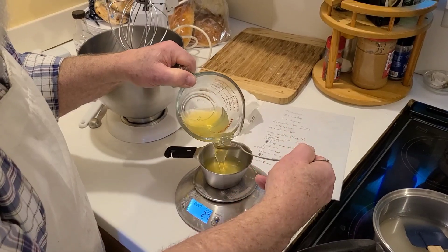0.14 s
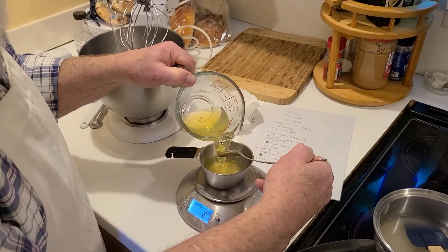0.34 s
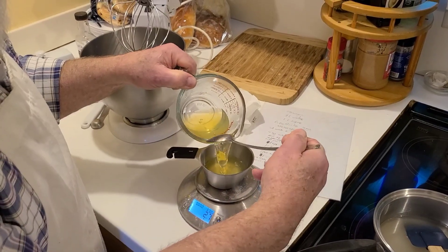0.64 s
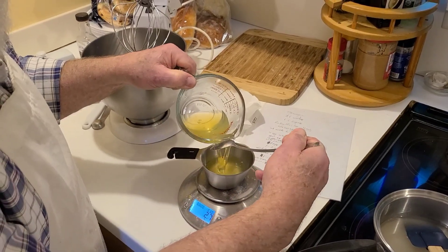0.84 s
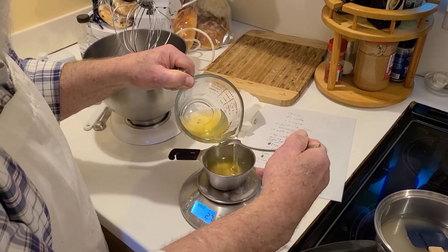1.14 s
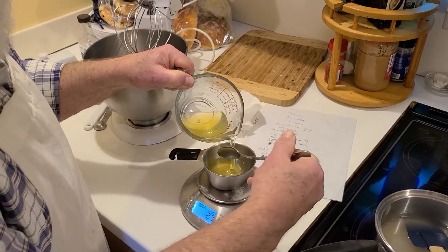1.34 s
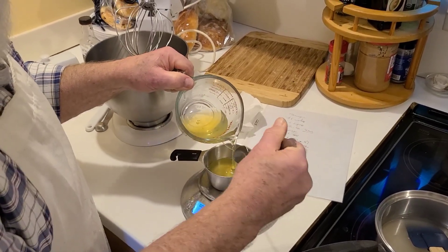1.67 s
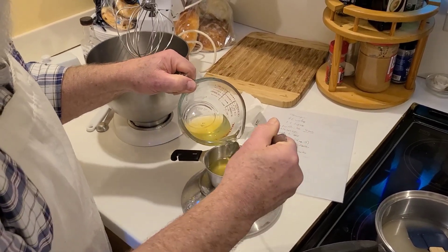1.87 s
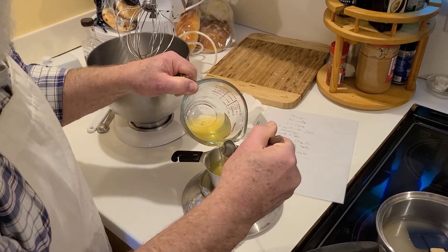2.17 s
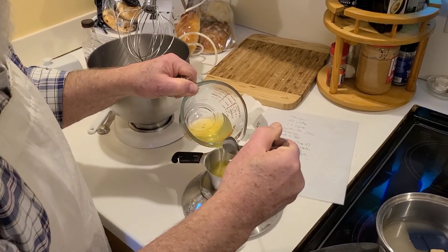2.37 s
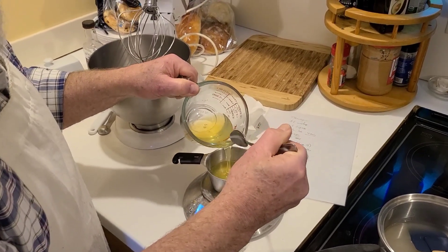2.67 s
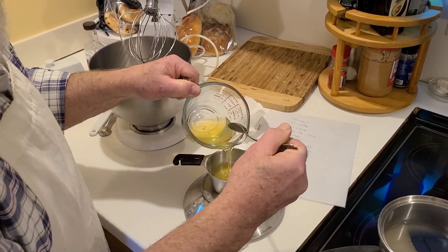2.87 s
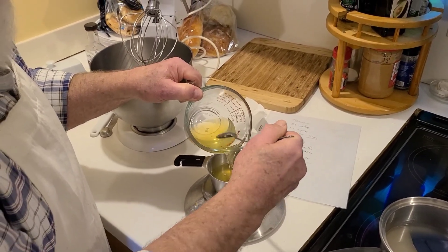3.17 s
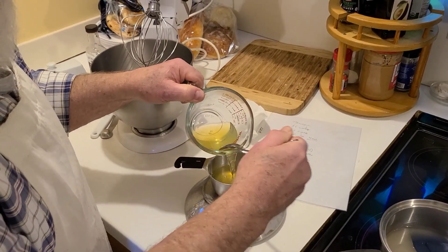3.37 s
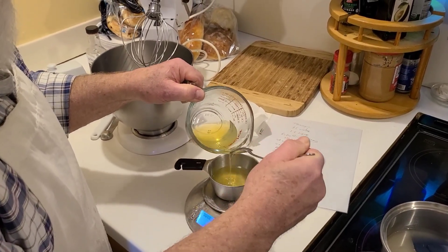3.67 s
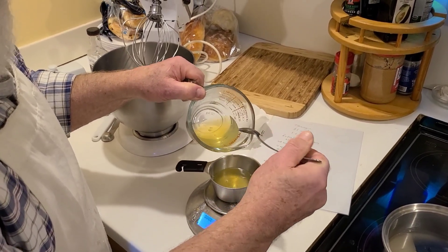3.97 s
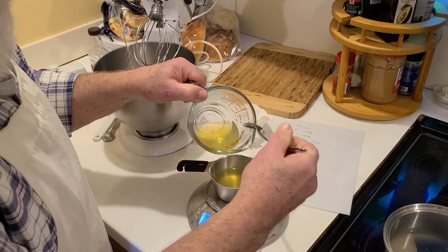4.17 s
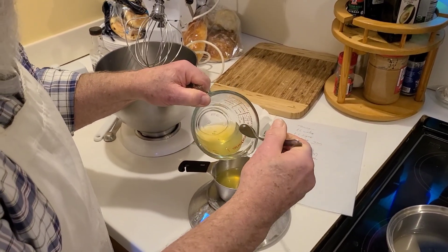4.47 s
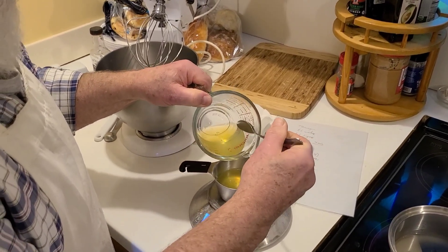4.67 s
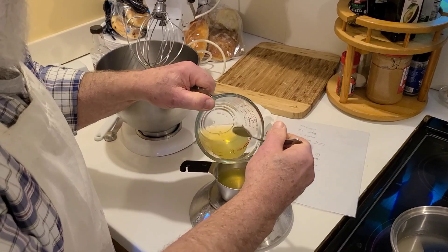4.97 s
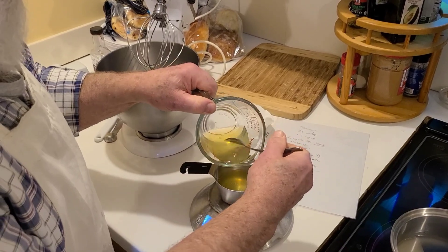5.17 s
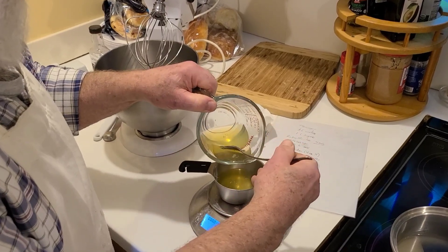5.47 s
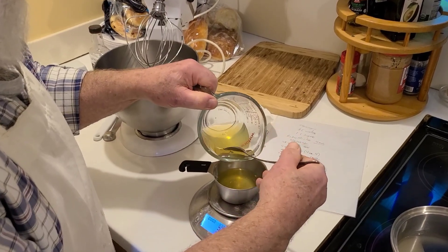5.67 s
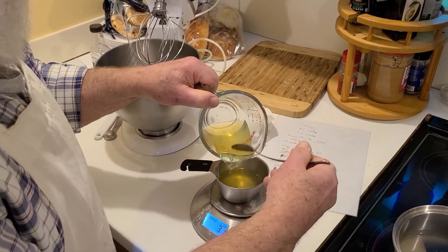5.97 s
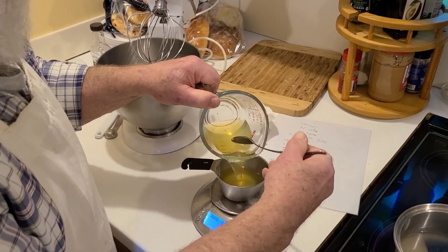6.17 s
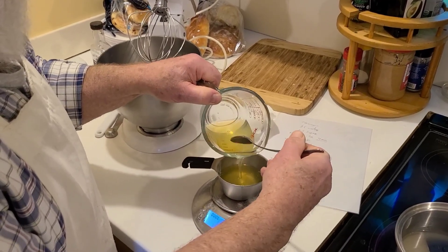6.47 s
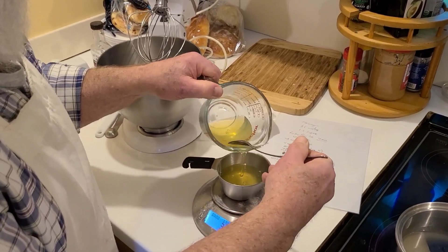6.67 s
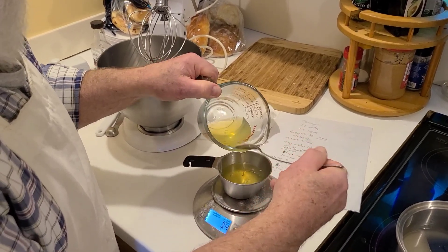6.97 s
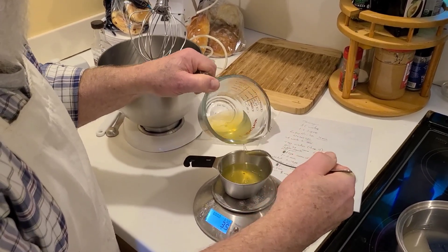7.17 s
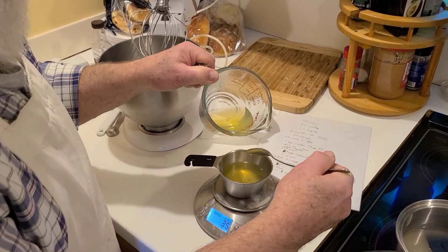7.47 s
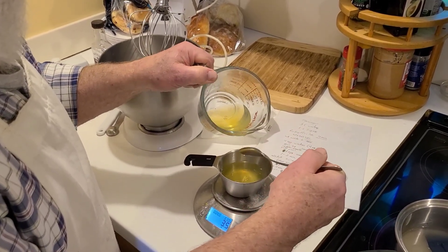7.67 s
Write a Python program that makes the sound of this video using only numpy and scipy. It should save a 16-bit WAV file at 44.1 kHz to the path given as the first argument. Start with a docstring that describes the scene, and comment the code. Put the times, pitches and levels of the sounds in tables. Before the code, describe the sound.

A faint appliance hum and thin hiss run throughout in a small kitchen with a short echo. Soft bumps and a light scrape open the scene, then a steel spoon clinks close by at 0.8 seconds. At about 2 seconds comes the loudest clink, ringing briefly on a glass jug and a steel cup, followed by a short squeak and small scrapes. Two soft scuffs pass around 2.5 to 2.7 seconds. From 3.4 to 3.8 seconds the spoon taps and scrapes the glass with a thin squeak, and it clinks clearly again at 4.3. Between 4.4 and 6 seconds things are moved with dull bumps, with wooden knocks at 4.7 and 5.5 and another clink at 5.2. From 6.7 to 7.1 seconds several light clinks mix with a scrape along the steel rim. Faint bumps follow near 7.5 seconds.

```python
"""On a kitchen counter, a steel spoon guides liquid from a glass measuring jug into a small steel cup.
What is heard is the spoon on both rims: impacts ring the modes of glass and steel, and stick-slip
friction makes scrapes and squeaks. Counter and walls answer closely. Scuffs, dull bumps and knocks
on wood come from elsewhere in the kitchen, over the hum of an appliance."""
import sys
import numpy as np
from scipy import signal
from scipy.fft import rfft, irfft, next_fast_len
from scipy.io import wavfile
from scipy.ndimage import map_coordinates

SR = 44100
rng = np.random.default_rng(int(sys.argv[2]) if len(sys.argv) > 2 else 0)


def wrap_up_sound(samples):
    """Save the sound to the file named by the first command line argument, as 16-bit audio."""
    columns = np.atleast_2d(samples).T
    # keep every value between -1 and 1, then stretch to whole-number steps
    tamed = np.clip(columns, -1, 1)
    steps = np.round(tamed * 32767).astype(np.int16)
    wavfile.write(sys.argv[1], SR, steps)


N = 345302
T = np.arange(N) / SR
LIFE = T[:SR // 2]  # time axis of one short event
TOP_HZ = 15600  # band limit

# normal modes of the glass jug, the steel cup and the spoon: (f/Hz, relative level/dB, t60/s)
JUG = [(1400, 2, .17), (1755, -6, .08), (1820, -7, .08), (2250, -11, .07), (3440, 1, .18), (3830, -4, .17),
       (4365, 3, .18), (5440, -9, .13), (6700, -9, .1), (7090, -8, .16), (8380, -5, .14), (9500, -7, .14),
       (10580, -11, .12), (12240, -15, .1)]
CUP = [(1330, -6, .08), (1420, -1, .1), (1490, -3, .13), (1790, -2, .07), (3440, 1, .13), (3712, 4, .12),
       (3820, -2, .14), (4490, -11, .12), (4680, -13, .1), (6630, -6, .11), (6765, -1, .11), (7208, 0, .13),
       (7685, -12, .13), (9330, -13, .1), (10490, -4, .12)]
SPOON = [(1710, -15, .08), (3190, 3, .07), (3275, 3, .1), (3820, -2, .13), (8310, -5, .09), (8830, -8, .08),
         (8960, -10, .12), (11720, -6, .14), (12130, -5, .15)]
# crossovers between the knock and the low, mid and top ring: (f/Hz)
RING_EDGES = [1100, 2500, 6000]


def clinks(cushion_s=.0008, choke_s=.006, rattle_t60=.09):
    """Impact excitation: each contact cracks, rattles and leaves jug, cup and spoon in free vibration."""
    # (t/s, knock, low, mid and top ring level/dB, jug, cup and spoon share/dB, choke/dB)
    contacts = [(0.187, -68, -46.5, -48, -62.5, 4, 2, -16, 11),
                (0.8151, -43, -36.5, -33.5, -34, -12, -6.5, 4, 4.5),
                (0.939, -68, -56, -62, -65.5, -12, -10, 2, -4),
                (1.581, -85, -65, -62, -85, -23, -29, 3, 20),
                (1.9597, -50, -27.5, -31.5, -34, 3.5, 7.5, -5, 2),
                (2.015, -75, -34.5, -37.5, -81, -14, 5, -25, 9),
                (3.3967, -65, -39, -37.5, -43.5, -16, -19, 10, 9),
                (3.5427, -72, -61, -59, -54.5, 0, -25, -12, 8), (3.6123, -73, -57, -54, -59, 8, -11, -8, 4),
                (3.7122, -59, -40, -42.5, -48.5, 2, -28, 2.5, 3),
                (4.3305, -45.5, -31.5, -33.5, -37.5, -1.5, -19, -25, 2),
                (4.568, -50, -41.5, -51, -55.5, 12, -33, -31, 13.5),
                (5.2318, -77, -38, -45.5, -50.5, 0.5, -9, -4, 0.5),
                (6.734, -87, -45.5, -37.5, -43, -6.5, -6, -3, 4),
                (6.866, -81, -49.5, -43.5, -57, 3.5, 0, 5, 11),
                (7.072, -63.5, -62, -48.5, -64, -8, -16, -10.5, 4),
                (7.1131, -76.5, -46.5, -44.5, -43.5, -9, 0.5, 6, -8)]
    # spectrum of the crack: (f/Hz, relative level/dB)
    crack_colour = [(250, -34.5), (750, -6.5), (1500, 3), (1900, 1.5), (2500, -12), (3700, 14.5),
                    (5400, -0.5), (6100, -14.5), (6800, -28.5), (9000, -10), (12200, -10.5), (13500, -7),
                    (15000, -15)]
    out = np.zeros((2, N))
    for start, *register_db, jug_db, cup_db, spoon_db, choke_db in contacts:
        crack = filtered(rng.standard_normal(len(LIFE)), lambda hz: amp(along(crack_colour, hz)))
        blow = crack * (amp(19 - 60 * LIFE / .014) + amp(5 - 60 * LIFE / rattle_t60))
        for db, modes in ((jug_db, JUG), (cup_db, CUP), (spoon_db, SPOON)):
            blow += amp(db) * ring(modes, scatter_db=.5, damping_db_per_s=333)  # grip and liquid damp it
        blow += amp(-14) * shimmer(t60=.11)
        blow *= 1 - np.exp(-LIFE / cushion_s)  # the wet rim softens the blow
        blow *= amp(choke_db * np.exp(-LIFE / choke_s))  # a spoon that stays in contact chokes the ring
        registers = split(kitchen(blow, near_t60=.035), RING_EDGES)
        onset = int(.016 * SR)  # the first moment sets each register's level
        clink = sum(amp(db) * part / rms(part[:, :onset]) for part, db in zip(registers, register_db))
        add(out, start, panned(clink, pan_db=3))
    return out


def shimmer(t60, count=50):
    """High modal density: a crowd of upper modes that changes with the spot struck."""
    frequencies = np.geomspace(2800, 13500, count) * np.exp(.02 * rng.standard_normal(count))
    return ring([(hz, 0, t60) for hz in frequencies], scatter_db=4)


def scrapes(touch_t60=.06, grit_t60=.0087):
    """Frictional excitation: tiny uneven slips drive the modes while the sliding spoon damps them."""
    # (t/s, rim, attack/s, hold/s, low, mid and top ring level/dB)
    drags = [(0.162, "jug", .022, 0.0023, -50, -47, -66), (2.019, "cup", .005, 0.025, -56.5, -43.5, -68),
             (2.296, "cup", 0.007, 0.071, -58.5, -66, -66), (2.366, "cup", 0.021, 0.02, -65, -55.5, -62.5),
             (3.547, "jug", 0.0089, 0.045, -64.5, -65.5, -65.5),
             (3.611, "jug", 0.0035, 0.094, -60, -50, -60), (3.696, "jug", 0.013, 0.075, -47.5, -52.5, -88),
             (4.488, "jug", 0.028, 0.032, -83, -72, -68), (4.698, "jug", 0.013, 0.045, -58, -58, -64),
             (5.103, "jug", .015, 0.042, -58, -52.5, -73), (6.196, "jug", 0.0074, 0.044, -74, -81, -76),
             (6.88, "cup", 0.022, 0.2, -59, -60, -68), (7.043, "cup", 0.059, 0.013, -53, -37.5, -49),
             (7.356, "cup", 0.021, 0.018, -62, -68, -96)]
    # response of each rim: (modes, left-right difference/dB, slip rate/Hz, grit/dB)
    rims = {"jug": (JUG[:3] + SPOON, 2.6, 1200, 23), "cup": (CUP, 2.5, 1700, 18)}
    # spectral weighting of the rubbing: (f/Hz, gain/dB)
    rub_colour = [(300, -11.5), (1100, -3.5), (1400, -10), (1850, -1.5), (2450, -12), (3600, 2), (4700, -4),
                  (6200, -23), (8500, -8.5), (10500, -10), (12500, -12.5), (15000, -14)]
    out = np.zeros((2, N))
    for start, rim, attack, hold, *register_db in drags:
        modes, pan_db, slips_per_s, grit_db = rims[rim]
        slips = (rng.random(len(LIFE)) < slips_per_s / SR) * rng.standard_normal(len(LIFE))
        body = ring(modes) * amp(-60 * LIFE / touch_t60)
        grit = amp(grit_db - 60 * LIFE / grit_t60) * rng.standard_normal(len(LIFE))
        rub = kitchen(signal.fftconvolve(slips, body + grit))[:, SR // 10:SR // 2]  # steady state
        rub = filtered(rub, lambda hz: amp(along(rub_colour, hz)))
        rub = weighted(rub, RING_EDGES[1:], register_db, attack + hold)
        pressure = stroke(T[:rub.shape[1]], attack, hold, fall_db_per_s=414)
        add(out, start, panned(pressure * rub, pan_db))
    return out


def squeaks(sharp=.219, settle_s=.00544, jitter=.013, overtone_fade_db_per_s=146):
    """Stick-slip oscillation: wet steel slips almost periodically, each slip with a puff of rasp."""
    # (t/s, hold/s, f/Hz, glide/(Hz/s), level/dB, relative overtone level/dB)
    slides = [(2.038, .008, 2036, 0, -41.5, -25), (2.148, 0.07, 2058, -620, -32, -1.5),
              (3.637, 0.0044, 1761, 0, -45.5, -32), (3.715, 0.099, 3220, 498, -50, -40),
              (4.662, 0.0088, 3324, -400, -59, -49), (4.741, 0.035, 3295, -200, -55.5, -40),
              (6.925, 0.088, 4460, 2500, -66, -19)]
    # spectrum of the rasp: (f/Hz, relative level/dB)
    rasp_colour = [(2800, -26), (3900, 3.5), (4500, -6), (5300, -18), (6600, -31), (8000, -12), (9500, -19),
                   (12000, -14), (15000, -27)]
    out = np.zeros((2, N))
    for start, hold, pitch_hz, glide, db, overtone_db in slides:
        hz = pitch_hz * (1 + sharp * np.exp(-LIFE / settle_s)) + glide * LIFE
        waver = np.interp(LIFE, LIFE[::32], rng.standard_normal(len(LIFE[::32])))
        phase = 2 * np.pi * np.cumsum(hz * (1 + jitter * waver)) / SR
        rasp = noise(rasp_colour, len(LIFE))[0] * (1 + .5 * np.cos(phase))
        upper = amp(overtone_db - overtone_fade_db_per_s * LIFE) * (np.sin(2 * phase) + amp(-9) * rasp)
        pressure = stroke(LIFE, attack=.014, hold=hold, fall_db_per_s=450)
        tone = amp(db) * np.sqrt(2) * pressure * (np.sin(phase) + upper)
        heard = kitchen(tone, near_db=7, near_t60=.04, tail_db=-2)
        heard *= np.sqrt(2) * np.linalg.norm(tone) / np.linalg.norm(heard)  # keep the tone's energy
        add(out, start, panned(heard, pan_db=1))
    return out


def scuffs(hollow_hz=1255, sink_octaves_per_s=4.4):
    """Sliding friction: broadband noise with a hollow resonance that sinks in pitch."""
    # a long scuff and a short slap: (t/s, attack/s, hold/s, scuff/dB, hiss/dB, relative resonance/dB)
    slides = [(2.497, 0.046, 0.042, -52, -58.5, -3.5), (2.704, 0.028, 0.0068, -43.5, -68, -14.5)]
    # spectrum of the friction: (f/Hz, relative level/dB)
    colour = [(60, -23), (130, -16), (260, -6.5), (400, -14.5), (600, -9), (1100, -10), (1500, -9.5),
              (1850, -11.5), (2400, -18), (3400, -9), (4900, -10), (6500, -46), (8000, -31), (14000, -64)]
    # crossover between scuff and hiss: (f/Hz)
    edges = [2200]
    out, t = np.zeros((2, N)), T[:SR]
    for start, attack, hold, *register_db, hollow_db in slides:
        hollow = narrowband(hollow_hz * 2 ** (-sink_octaves_per_s * t), half_width_hz=110)
        scuff = weighted(noise(colour, SR) + amp(hollow_db) * hollow, edges, register_db, attack + hold)
        add(out, start, stroke(t, attack, hold, fall_db_per_s=197) * scuff)
    return out


def bumps():
    """Forced vibration: things being moved rumble and rattle, each stirring one low resonance."""
    # (t/s, hold/s, boom, body and clatter level/dB, resonance f/Hz, relative resonance level/dB)
    moves = [(0.0, 0.068, -52, -47, -53.5, 264, 0), (0.218, 0.024, -62, -50, -74, 254.6, -7.5),
             (4.411, 0.18, -75, -58.5, -62.5, 259.6, -9), (4.547, 0.15, -67, -51.5, -62, 264, -1.5),
             (4.703, .04, -46, -40.5, -45.5, 266, -14), (4.822, 0.13, -53, -46, -54, 261.4, -10),
             (4.98, 0.19, -67, -52, -57, 176.3, -9), (5.101, 0.02, -43, -37.5, -47, 128.3, -17),
             (5.541, 0.059, -57, -50.5, -60, 232, -20), (5.737, 0.057, -43.5, -51.5, -55.5, 58, 8),
             (5.911, .02, -69, -73, -64, 298, -18), (7.463, 0.089, -87, -59.5, -60, 179, 1.5),
             (7.661, 0.072, -78, -62, -100, 181, 9)]
    # spectrum of the rumble: (f/Hz, relative level/dB)
    colour = [(25, -58), (42, -13), (60, 3.5), (82, -7), (128, 3), (210, -1.5), (262, 2), (400, -5.5),
              (520, -15), (700, -11.5), (900, -17.5), (1600, -18.5), (2300, -27), (3500, -27.5),
              (5000, -39), (6500, -65.5), (15000, -53)]
    # crossovers between boom, body and clatter: (f/Hz)
    edges = [110, 450]
    out, t = np.zeros((2, N)), T[:SR]
    for start, hold, *register_db, hz, resonance_db in moves:
        rattle_db = np.interp(t, np.linspace(0, 1, 90), rng.standard_normal(90))
        rumble = noise(colour, SR) + amp(resonance_db) * sine(hz, t)
        push = stroke(t, attack=.013, hold=hold, fall_db_per_s=157)
        add(out, start, push * weighted(rumble * amp(rattle_db), edges, register_db, hold))
    return out


def wood_knocks(thud_t60=.13, cushion_s=.0015):
    """Heavily damped vibration: a soft blow on wood gives a few short modes and a thud."""
    # (t/s, level/dB)
    blows = [(4.728, -40), (5.462, -46.5)]
    # modes of the wood: (f/Hz, relative level/dB, t60/s)
    modes = [(600, -3, .06), (690, -2, .07), (780, -1, .08), (1250, -11, .06), (1480, -8, .06)]
    # spectrum of the thud: (f/Hz, relative level/dB)
    thud_colour = [(100, 5.5), (450, -4.5), (700, 13), (1000, -13), (1500, -8), (2000, -21), (4000, -23),
                   (7000, -45)]
    out = np.zeros((2, N))
    for start, db in blows:
        thud = amp(5 - 60 * LIFE / thud_t60) * noise(thud_colour, len(LIFE))
        blow = (ring(modes) + thud) * (1 - np.exp(-LIFE / cushion_s))
        knock = kitchen(blow, near_db=2, near_t60=.027, tail_db=0)
        add(out, start, amp(db) * knock / rms(knock[:, :SR // 20]))
    return out


def room_tone(air_db=-63.5, hiss_db=-74, hum_gain_db=-1):
    """Line and continuous spectra: an appliance hums over soft air noise and a thin, steady hiss."""
    # lines of the hum, spectra of air and hiss: (f/Hz, relative level/dB)
    hum_lines = [(59.2, -70.5), (118.4, -78.5), (296.1, -74), (371.4, -77.5), (532.9, -84)]
    air_colour = [(12, -38), (20, -8.5), (63, -1.5), (87, -15.5), (109, -11), (173, -5.5), (197, -13),
                  (293, -8.5), (325, -12), (369, -13), (768, -20.5), (1030, -20.5), (3000, -28),
                  (3900, -69), (6600, -120)]
    hiss_colour = [(2300, -24), (3200, 3), (3700, 6), (4250, 4.5), (4900, -2.5), (5800, -19), (7800, -24.5),
                   (9000, -9), (10400, -8), (11500, -9.5), (15000, -14)]
    hum = sum(amp(db + hum_gain_db) * sine(hz, T) for hz, db in hum_lines)
    return hum + amp(air_db) * noise(air_colour, N) + amp(hiss_db) * noise(hiss_colour, N)


def kitchen(x, near_db=0, near_t60=.058, tail_db=-5):
    """Reverberation: direct sound, early reflections off counter and bowls, and a diffuse tail."""
    # reverberation time of the room: (f/Hz, t60/s)
    decay_times = [(300, 0.065), (1500, 0.34), (4000, 0.29), (8000, 0.25), (14000, 0.073)]
    hz, t, spectrum = signal.stft(rng.standard_normal((2, len(LIFE))), SR, nperseg=256)
    spectrum *= amp(-60 * t / along(decay_times, hz)[:, None])
    tail = signal.istft(spectrum, SR, nperseg=256)[1][:, :len(LIFE)]
    near = rng.standard_normal(tail.shape) * amp(-60 * LIFE / near_t60)
    echo = amp(tail_db) * tail / np.linalg.norm(tail[0]) + amp(near_db) * near / np.linalg.norm(near[0])
    echo[:, 0] += 1  # direct path
    return signal.fftconvolve(np.atleast_2d(x), echo, axes=1)


def panned(x, pan_db):
    """Level difference: a source left of centre, each register reflected to its own side by the bowls."""
    # (f/Hz, left-right difference/dB)
    lean = [(700, 1), (1250, -6.5), (2100, -1.5), (3600, 5), (5000, 1), (6600, 12.5), (8800, -5),
            (12500, 9)]

    def balance(hz):
        sides = amp((pan_db + along(lean, hz)) * np.array([[.5], [-.5]]))
        return sides / np.sqrt(np.mean(sides ** 2, axis=0))
    return filtered(x, balance)


def ring(modes, scatter_db=7, damping_db_per_s=0):
    """Modal superposition at random strengths; the added damping, given at TOP_HZ, scales with pitch."""
    out = np.zeros(len(LIFE))
    for hz, db, t60 in modes:
        fall_db_per_s = 60 / t60 + damping_db_per_s * hz / TOP_HZ
        envelope = amp(db - scatter_db * rng.normal() - fall_db_per_s * LIFE)
        out += envelope * np.sin(2 * np.pi * (hz * LIFE + rng.random()))
    return out


def noise(colour, size):
    """Partial coherence: coloured stereo noise of rms 1, nearly mono in the bass."""
    # (f/Hz, left-right correlation)
    coherence = [(60, .99), (150, .98), (300, .92), (600, .6), (1200, .15), (8000, .05)]

    def mid_side_gains(hz):
        angle = np.arccos(np.clip(along(coherence, hz), -1, 1)) / 2
        return amp(along(colour, hz)) * [np.cos(angle), np.sin(angle)]
    mid, side = filtered(rng.standard_normal((2, size)), mid_side_gains)
    pair = np.array([mid + side, mid - side])
    return pair / rms(pair)


def narrowband(hz, half_width_hz):
    """Quadrature modulation: one second of noise in a narrow band that follows hz."""
    blur = filtered(rng.standard_normal((2, SR)), lambda f: 1 / (1 + (f / half_width_hz) ** 4))
    phase = 2 * np.pi * np.cumsum(hz) / SR
    band = blur[0] * np.sin(phase) + blur[1] * np.cos(phase)
    return band / rms(band)


def sine(hz, t):
    """Simple harmonic motion of rms 1 and random phase."""
    return np.sqrt(2) * np.sin(2 * np.pi * (hz * t + rng.random()))


def stroke(t, attack, hold, fall_db_per_s):
    """Envelope of one movement: quadratic rise, hold and exponential decay."""
    return np.clip(t / attack, 0, 1) ** 2 * amp(-fall_db_per_s * np.maximum(t - attack - hold, 0))


def weighted(texture, edges, register_db, length_s):
    """Equalisation: each register takes its own rms level over a movement and the next 50 ms."""
    span = int(length_s * SR) + SR // 20
    return sum(amp(db) * part / rms(part[:, :span]) for part, db in zip(split(texture, edges), register_db))


def split(x, edges):
    """Fourth-order crossovers: the registers of a sound, lowest first."""
    parts = []
    for hz in edges:
        low, high = (signal.butter(2, hz, kind, fs=SR, output="sos") for kind in ("low", "high"))
        parts.append(signal.sosfilt(np.vstack([low, low]), x))
        x = signal.sosfilt(np.vstack([high, high]), x)
    return parts + [x]


def filtered(x, response):
    """Zero-phase filtering: the spectrum of x times response(hz)."""
    n = x.shape[-1]
    padded = next_fast_len(n + 4096)
    return irfft(rfft(x, padded) * response(np.fft.rfftfreq(padded, 1 / SR)), padded)[..., :n]


def along(points, hz):
    """Interpolation of (f/Hz, value) points on a logarithmic frequency axis."""
    f, values = np.transpose(points)
    return np.interp(np.log(hz + 1), np.log(f), values)


def amp(db):
    """Decibels to amplitude ratio."""
    return 10 ** (np.asarray(db) / 20)


def rms(x):
    """Root mean square of all channels."""
    return np.sqrt(np.mean(x ** 2) + 1e-20)


def add(out, start_s, x):
    """Superpose x on out from start_s on."""
    i = round(start_s * SR)
    out[:, i:i + x.shape[-1]] += x[..., :N - i]


def scene():
    """Superposition: spoon work in front, the kitchen behind."""
    return clinks() + scrapes() + squeaks() + scuffs() + bumps() + wood_knocks() + room_tone()


def record(dry):
    """Low-pass filtering: the sound falls away steeply at the band limit."""
    return filtered(dry, lambda hz: 1 / np.sqrt(1 + (hz / TOP_HZ) ** 120))


dry = scene()
out = record(dry)
wrap_up_sound(out)
```